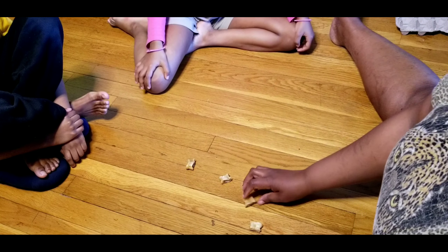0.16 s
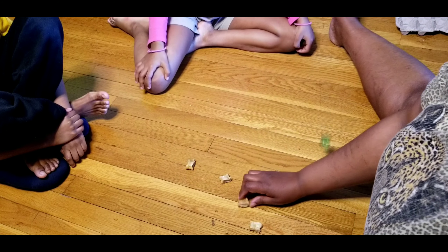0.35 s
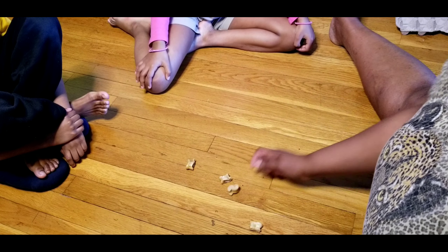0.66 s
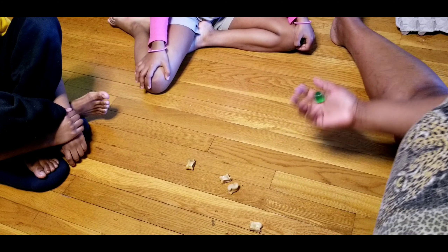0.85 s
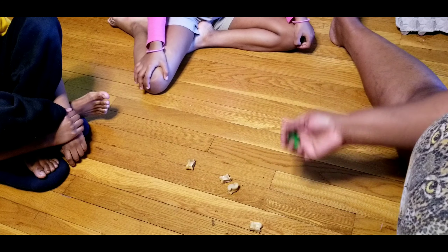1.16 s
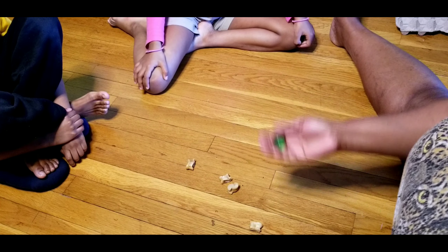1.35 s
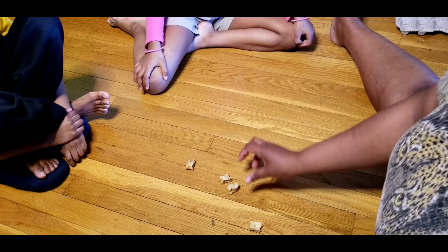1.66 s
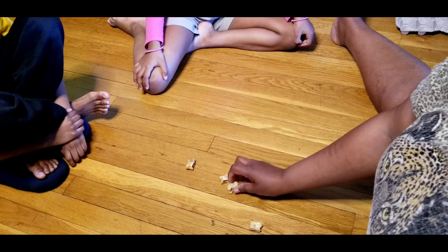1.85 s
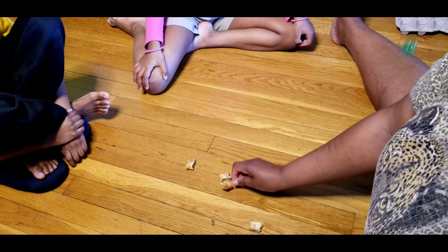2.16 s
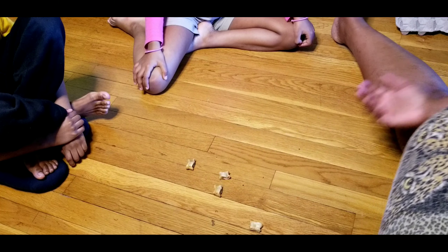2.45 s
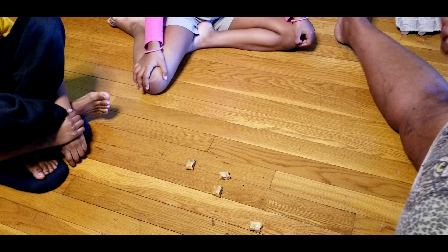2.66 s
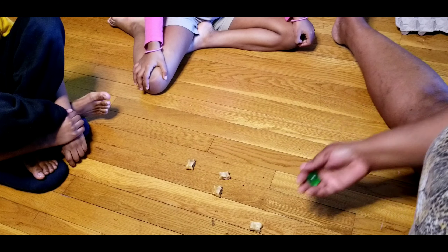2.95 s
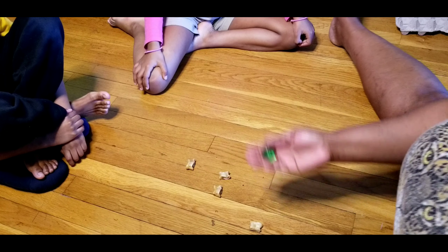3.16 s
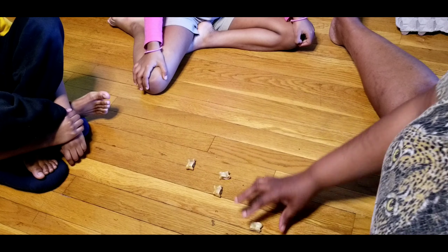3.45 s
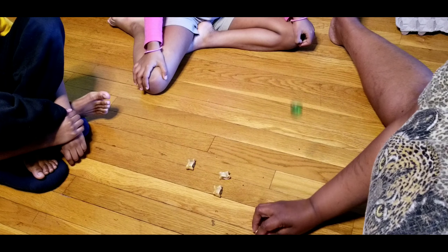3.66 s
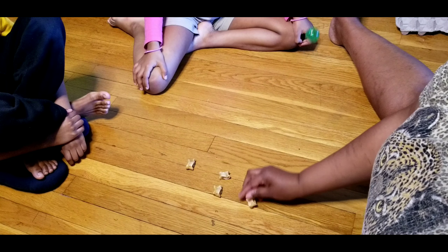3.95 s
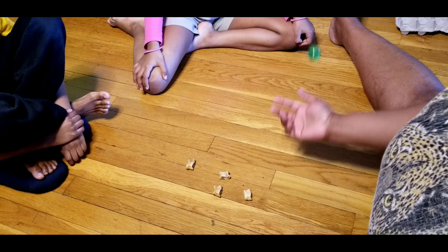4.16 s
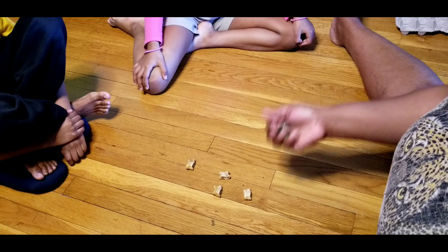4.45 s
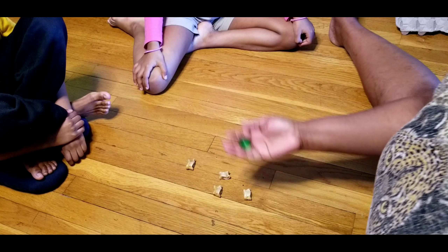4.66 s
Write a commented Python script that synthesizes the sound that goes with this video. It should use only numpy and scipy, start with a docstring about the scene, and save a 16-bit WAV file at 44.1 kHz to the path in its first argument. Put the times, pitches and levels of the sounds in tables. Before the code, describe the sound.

Close on a wooden floor in a furnished room, a small ball lands with a hollow, woody thump, followed by light bone clacks. A second, softer bounce brings a dense, bright rattle of knucklebones; a third, softer still, brings a short crisp clatter. Fingers brush the boards and the palm pats softly. Faint appliance hum and airy hiss lie underneath, picked up by a small nearby stereo microphone.

```python
"""A rubber ball bounces three times on a sprung wooden floor in a furnished room: each landing rings floor modes.
Between the bounces a hand works small knucklebones: clacks ring short wood and bone modes, nudged bones
tick at one pitch, drags are random slips through the same modes, palm and knuckles thud on the floor.
Treble hiss swells and sinks; an appliance hums and hisses faintly far away as wavering sines
and coloured noise, and a thin tone comes and goes. The room adds a tail of decaying noise."""
import sys
import numpy as np
from scipy import signal
from scipy.fft import rfft, irfft
from scipy.io import wavfile

SR = 44100
rng = np.random.default_rng(int(sys.argv[2]) if len(sys.argv) > 2 else 0)


def pcm_store(signal):
    """Save signal as 16-bit PCM."""
    levels = np.round(np.clip(np.atleast_2d(signal), -1, 1) * 32767)
    wavfile.write(sys.argv[1], SR, levels.astype(np.int16).T)


def gain_from_db(level_db):
    """Convert decibel levels to linear amplitude factors (20 dB per decade)."""
    decades = np.asarray(level_db, float) / 20
    return 10 ** decades


N = 212562
CONTROL_STEP = 40   # samples between points of slow curves
KNOCK_TOP_HZ, EDGE_TOP_HZ, SNAP_TOP_HZ = 2800, 6900, 16500   # contact time rounds off above these


def rms_one(x):
    """Scale to unit rms."""
    return x / np.sqrt(np.mean(x ** 2) + 1e-20)


def at_hz(points, hz):
    """Read a table on a log-frequency axis."""
    table_hz, values = np.array(points)[:, :2].T
    return np.interp(np.log(hz), np.log(table_hz), values)


def cut(x, hz, kind):
    """Steep causal low- or high-pass."""
    return signal.sosfilt(signal.butter(4, hz, kind, fs=SR, output="sos"), x)


def drift(rate_hz):
    """Slow random wander of rms 1: noise through two equal one-pole low-passes."""
    r = np.exp(-2 * np.pi * rate_hz * CONTROL_STEP / SR)
    noise = rng.standard_normal(N // CONTROL_STEP + 2002)
    slow = signal.lfilter([1], [1, -2 * r, r * r], noise)[2000:]   # settled part
    return np.interp(np.arange(N) / CONTROL_STEP, np.arange(len(slow)), rms_one(slow))


def swells(times, peak_db, rise_db_per_s, fall_db_per_s):
    """Gain of overlapping swells, straight in dB up to a crest and down; powers add."""
    late_s = np.arange(0, N + CONTROL_STEP, CONTROL_STEP) / SR - np.reshape(times, (-1, 1))
    shape_db = np.minimum(rise_db_per_s * late_s, -fall_db_per_s * late_s)
    power = gain_from_db(np.reshape(peak_db, (-1, 1)) + shape_db) ** 2
    return np.interp(np.arange(N) / CONTROL_STEP, np.arange(late_s.shape[1]), np.sqrt(power.sum(0)))


def ring(clicks, hz, t60_s):
    """Mode as a two-pole resonator: a unit click starts a decaying sine of initial height 1."""
    r, w = gain_from_db(-60 / (t60_s * SR)), 2 * np.pi * hz / SR
    return signal.lfilter([0, np.sin(w)], [1, -2 * r * np.cos(w), r * r], clicks + 1e-18)


def impulses(times, sizes):
    """Clicks at given times; sizes may hold two channels."""
    out = np.zeros(np.shape(sizes)[:-1] + (N,))
    out[..., np.round(np.asarray(times) * SR).astype(int)] = sizes
    return out


def contact(x, seconds):
    """A soft contact spreads a click into a half-sine push of unit area."""
    push = np.sin(np.pi * np.arange(.5, seconds * SR) / (seconds * SR))
    return signal.lfilter(push / push.sum(), [1], x)


def focus_db(hz, centre_hz):
    """Modes near the centre of a contact answer most; loss grows with octaves squared."""
    return -13.5 * np.log2(hz / np.maximum(centre_hz, 300)) ** 2


# Left-right likeness of diffuse sound. Each row: frequency in Hz, correlation.
LIKENESS = [(60, 0.75), (180, 0.86), (550, 0.51), (1650, 0.018), (4970, 0.089), (15000, -0.45)]


def spread(mid, side, hz):
    """Mix two independent signals into left and right of the tabled likeness."""
    alike = np.clip(at_hz(LIKENESS, hz), -1, 1)
    return np.sqrt(1 + alike) * mid + np.sqrt(1 - alike) * side * [[1], [-1]]


def diffuse(spectrum):
    """Stereo noise of a given colour at rms 1."""
    hz = np.maximum(np.fft.rfftfreq(N, 1 / SR), 1)
    mid, side = rfft(rng.standard_normal((2, N)))
    return rms_one(irfft(spread(mid, side, hz) * gain_from_db(at_hz(spectrum, hz)), N))


# Ball landings. Each row: start in seconds, relative level in dB.
BOUNCES = [(0.3966, 0), (2.0768, -4.5), (3.7942, -8)]
# Floor modes. Each row: frequency in Hz, free t60 in s, relative level in dB at each of three landing spots.
FLOOR_MODES = [(60.7, .25, 2.5, 3, 12.5), (92.4, 0.33, -11.5, -6, -7), (136.5, 0.16, -37, -19, -40),
               (191.3, 0.37, -15.5, -13, -8), (220.4, 0.3, -20, -12, -8.5), (281, 0.062, 3, 8, 12.5),
               (317.4, 0.11, -7.5, -8.5, 2), (382, 0.078, -15.5, -6.5, 8), (431, 0.13, -16, -5, 0.5),
               (507.8, 0.054, 8.5, 2, 10), (513.6, 0.068, -3, 10.5, -13), (640, 0.11, -14, -16, -16),
               (729.5, 0.1, -15.5, -9.5, -9.5), (900, 0.073, -10, -5, -7)]
# Small wood and bone modes: knock, hard edge, thin snap. Each row: frequency in Hz, relative level in dB,
# t60 in s of a bone's ring.
KNOCK_MODES = [(513, 3, 0.065), (767, -5.5, 0.024), (878, -12, 0.03), (1060, -10.5, 0.022),
               (1388, -2.5, 0.013), (1720, 3.5, 0.0056), (2113, 0.5, 0.014), (2530, 5.5, .006)]
EDGE_MODES = [(3300, -16, 0.0082), (4074, -6, 0.0022), (4716, -1.5, 0.0023), (5500, -5.5, 0.0018)]
SNAP_MODES = [(8540, 15, 0.0011), (9260, -7, 0.00056), (13500, -13.5, 0.0018)]


def ball():
    """Each landing pushes the floor modes by spot, slaps small wood modes and ticks the rubber skin."""
    lag_cycles = 0.56   # the boards pass the blow on: every other mode starts later
    s, level_db = np.transpose(BOUNCES)
    boom = slap = skin = 0
    for k, (hz, t60_s, *spot_db) in enumerate(FLOOR_MODES):
        push = -gain_from_db(level_db + np.array(spot_db) - 16.0)
        boom = boom + ring(impulses(s + k % 2 * lag_cycles / hz, push), hz, t60_s)
    for k, (hz, db, t60_s) in enumerate(KNOCK_MODES):
        blow = gain_from_db(level_db + db + focus_db(hz, 1150) - 16.5)
        slap = slap + (-1) ** k * ring(impulses(s + 0.00098, blow), hz, 0.75 * t60_s)
    for hz, _, t60_s in EDGE_MODES + SNAP_MODES:
        skin = skin + ring(impulses(s, gain_from_db(level_db - 47.5)), hz, t60_s)
    boom = cut(contact(boom, seconds=0.0011), 130, "high")   # boards radiate little below this
    return boom, cut(slap, 2200, "low") + skin


# Bones striking boards and each other. Each row: start in seconds, relative level in dB of knock,
# of edge, of snap, knock centre in Hz.
CLACKS = [(0.1893, -38, -55, -73, 1190), (0.227, -33.5, -49.5, -74, 1410), (0.2328, -41, -58, -72, 1340),
          (0.2787, -45, -42.5, -73.5, 1680), (0.5492, -31.5, -66, -85, 1230),
          (0.6319, -29.5, -64, -81, 1060), (0.6655, -33.5, -55, -76, 1110), (0.6816, -26.5, -34, -66, 1330),
          (0.6871, -25, -31, -55, 1150), (0.7034, -36.5, -55, -61, 1220), (0.7561, -29, -42, -74, 1240),
          (1.2612, -46, -48.5, -58, 1420), (1.3462, -46, -59.5, -61.5, 1085),
          (2.1869, -19.5, -19, -45, 1270), (2.2016, -22.5, -26, -42.5, 1300),
          (2.2525, -26.5, -18, -44, 1250), (2.2556, -21, -42, -54, 1320), (2.2655, -40, -42, -36.5, 1160),
          (2.3019, -21.5, -24, -52, 1230), (2.3212, -43, -15, -52, 1260), (2.3241, -29, -29, -33, 1340),
          (2.3337, -27.5, -38, -56, 1090), (2.3823, -27.5, -50, -50.5, 1320), (2.4005, -36, -34, -55, 1060),
          (2.419, -24.5, -20, -46, 1430), (2.4292, -55, -50.5, -41.5, 1020), (2.471, -28, -21.5, -44, 1530),
          (2.4868, -25.5, -58, -47, 1330), (2.5001, -45, -23, -44, 1380), (2.5129, -31, -50, -48, 1330),
          (2.5204, -44, -24, -47, 1210), (2.5279, -30, -51, -48, 1540), (2.5403, -35, -26, -43, 1430),
          (2.56, -41, -31, -62, 1410), (2.5726, -34, -31, -59, 1160), (2.583, -37.5, -53, -53, 1400),
          (2.9604, -36.5, -47, -53.5, 1394), (3.659, -37, -60, -66, 1200), (3.9474, -33, -47, -79, 1280),
          (3.9827, -19.5, -18.5, -35.5, 1410), (4.0118, -62, -39, -38, 1340),
          (4.0693, -23.5, -20, -29, 1410), (4.075, -33, -31, -57, 1380), (4.1119, -55, -35, -36.5, 1480),
          (4.1415, -26, -20.5, -38.5, 1580), (4.18, -30, -26.5, -45, 1580), (4.2133, -29.5, -37, -52, 1230),
          (4.237, -32, -30.5, -50, 1530)]
# Where the hand works. Each row: time in seconds, left minus right in dB.
HAND = [(0.19, 5), (0.28, -2), (0.7, 4), (1.3, 14.5), (2.0, 3), (2.19, 1), (2.55, 1.5), (2.96, 10),
        (3.8, 7.5), (4.2, -1)]


def bones():
    """Every clack strikes each mode with a strength of its own; the first swing is a pull."""
    s, *blows_db, centre_hz = np.transpose(CLACKS)
    scatter_db = 6.5 * rng.standard_normal(len(s))   # single bones land left or right of the hand
    pan_db = np.interp(s, *np.transpose(HAND)) + scatter_db
    tops_hz = KNOCK_TOP_HZ, EDGE_TOP_HZ, SNAP_TOP_HZ
    shades_db = 0, -1.5, -3.0   # the treble is shaded on the left
    out = 0
    for modes, blow_db, top_hz, shade_db in zip((KNOCK_MODES, EDGE_MODES, SNAP_MODES), blows_db, tops_hz, shades_db):
        sides = gain_from_db((pan_db + shade_db) * [[.5], [-.5]])
        strength_db = rng.normal(0, 2.0, (len(s), len(modes)))
        if modes is KNOCK_MODES:
            strength_db = strength_db + focus_db(np.array(modes)[:, 0], centre_hz[:, None])
        rings = 0
        for k, (hz, db, t60_s) in enumerate(modes):
            blow = sides * gain_from_db(blow_db + db - 6.5 + strength_db[:, k])
            rings = rings + ring(impulses(s, blow), hz, t60_s)
        out = out - cut(rings, top_hz, "low")
    return out


# Bones nudged inside the cupped hand. Each row: start in seconds, relative level in dB, hollow pitch in Hz.
TICKS = [(0.278, -39, 1700), (0.303, -54.5, 1800), (1.929, -43, 1400), (1.9904, -41.5, 1340),
         (2.014, -64.5, 1400), (2.0539, -45.5, 1300), (3.777, -40.5, 1720), (3.86, -40, 1357)]


def ticks():
    """One damped resonance per nudge, softly struck."""
    rings = sum(ring(impulses([s], [gain_from_db(db)]), hz, t60_s=.025) for s, db, hz in TICKS)
    return contact(rings, seconds=.0003)


# Fingers and bones dragged over the boards. Each row: hardest pressure in seconds, relative dull level in dB,
# relative bright level in dB, centre of the dull rub in Hz.
DRAGS = [(0.118, -62, -81, 714), (0.213, -49, -70, 1150), (0.283, -59, -78, 1670), (0.56, -47, -76, 1010),
         (0.59, -71, -89, 800), (0.715, -47, -74, 1040), (0.76, -55, -67, 1035), (0.8, -72, -68, 1035),
         (1.34, -68, -76.5, 780), (1.689, -73, -97, 1900), (1.769, -67, -90, 550), (1.83, -71.5, -100, 550),
         (1.95, -51.5, -100, 1250), (2.009, -78, -95, 1100), (2.45, -46, -68, 1210), (2.51, -55, -74, 1110),
         (2.68, -66.5, -73, 950), (2.869, -66, -92, 600), (2.911, -79, -89.5, 600), (2.94, -87, -75, 1100),
         (3.57, -63, -77, 805), (3.66, -48, -71.5, 1200), (3.7, -74, -93, 900), (3.76, -62, -98, 1330),
         (4.2, -59, -66, 1100), (4.256, -64, -66, 1300), (4.33, -85.5, -82, 1390)]


def drags():
    """Tiny random slips of uneven size excite knock and edge modes under swelling pressure."""
    slips_per_s, press_db_per_s, lift_db_per_s, grip_waver_db = 870.0, 351, 245.5, 3.5
    size = gain_from_db(4.5 * np.minimum(rng.exponential(1, N), 4))
    slips = (rng.random(N) < slips_per_s / SR) * size * rng.choice([-1, 1], N)
    s, dull_db, bright_db, centre_hz = np.transpose(DRAGS)
    centre_hz = np.interp(np.arange(N) / SR, s, centre_hz)
    dull = bright = 0
    for k, (hz, db, t60_s) in enumerate(KNOCK_MODES):
        dull = dull + (-1) ** k * gain_from_db(db + focus_db(hz, centre_hz)) * ring(slips, hz, t60_s)
    for k, (hz, db, t60_s) in enumerate(EDGE_MODES):
        bright = bright + (-1) ** k * gain_from_db(db) * ring(slips, hz, t60_s)
    dull = swells(s, dull_db, press_db_per_s, lift_db_per_s) * rms_one(cut(dull, KNOCK_TOP_HZ, "low"))
    bright = swells(s, bright_db, press_db_per_s, lift_db_per_s) * rms_one(cut(bright, EDGE_TOP_HZ, "low"))
    return gain_from_db(-4.5 + grip_waver_db * drift(32)) * (dull + bright)   # uneven grip


# Soft palm and knuckle thuds. Each row: start in seconds, relative level in dB.
THUDS = [(0.117, -46), (0.133, -41), (0.324, -48), (1.261, -41), (1.326, -41.5), (1.35, -43.5),
         (1.372, -46.5), (2.959, -35.5), (2.988, -40.5), (3.589, -45), (3.618, -43.5)]


def thuds():
    """Flesh lands slowly, so mostly the low floor modes answer, damped by the hand."""
    hand_damping = .4   # share of the free ring time
    s, level_db = np.transpose(THUDS)
    strength_db = rng.normal(0, 6.0, (len(s), len(FLOOR_MODES)))
    modes = 0
    for k, (hz, t60_s, *_) in enumerate(FLOOR_MODES):
        modes = modes + ring(impulses(s, gain_from_db(level_db - 12.5 + strength_db[:, k])), hz, hand_damping * t60_s)
    return cut(contact(modes, seconds=0.00307), 75, "high")


# Reverberation of the room. Each row: frequency in Hz, t60 in s.
ROOM_T60 = [(100, 0.42), (300, 0.3), (550, 0.23), (1000, 0.31), (3000, 0.37), (8000, 0.11), (15000, 0.2)]


def room(x):
    """Diffuse echoes: third-octave noise bands, each dying at its own rate."""
    t = np.arange(SR // 2) / SR
    white = rng.standard_normal((2, 2, len(t)))
    edges_hz = 25 * 2 ** (np.arange(29) / 3)
    tail = 0
    for k, (low, high) in enumerate(zip(edges_hz, edges_hz[1:])):
        band = signal.butter(2, [low, high], "band", fs=SR, output="sos")
        mid, side = signal.sosfilt(band, white[k % 2])
        hz = np.sqrt(low * high)
        tail = tail + spread(mid, side, hz) * gain_from_db(-60 * t / at_hz(ROOM_T60, hz))
    tail = tail * np.clip((t - .001) / .002, 0, 1)   # opens from 1 to 3 ms
    tail = tail / np.sqrt(np.sum(tail ** 2) / 2)
    return gain_from_db(0.6) * signal.fftconvolve(x[None], tail, axes=1)[:, :N]


# Swells of treble hiss. Each row: crest in seconds, level in dB.
HISS_SWELLS = [(0.08, -68), (0.454, -70.5), (0.7, -75.5), (0.82, -64), (1.265, -66), (1.48, -67.5),
               (1.774, -67.5), (2.1, -72), (2.4, -57), (2.668, -73), (2.958, -62.5), (3.298, -63),
               (3.556, -67), (3.8, -71.5), (4.1, -64), (4.3, -70), (4.564, -70), (4.82, -67.5)]
# Colour of treble hiss. Each row: frequency in Hz, relative density in dB per Hz.
HISS_COLOUR = [(5000, -44.5), (7800, -13.5), (8300, -5), (10000, -3.5), (13500, 2), (16000, -6)]


def treble_hiss():
    """Treble hiss swells and sinks over a faint constant level."""
    s, swell_db = np.transpose(HISS_SWELLS)
    gain = swells(s, swell_db, rise_db_per_s=102.5, fall_db_per_s=68.5) + gain_from_db(-83.5)
    return gain * diffuse(HISS_COLOUR)


# Appliance hum lines. Each row: frequency in Hz, middle level in dB rms, waver rate in Hz.
HUM = [(49.5, -66, 14), (116.7, -64, 1.1), (244, -68.5, 13)]


def hum():
    """Narrow lines: sines wavering in level and phase."""
    t = np.arange(N) / SR
    out = 0
    for hz, db, rate_hz in HUM:
        line = np.sqrt(2) * np.sin(2 * np.pi * hz * t + drift(rate_hz))
        out = out + gain_from_db(db + 2.0 * drift(rate_hz)) * line
    return out


# Thin tone. Each row: time in seconds, left level in dB rms.
WHINE = [(2.6, -110), (2.7, -68), (3.5, -77), (3.7, -110)]


def whine():
    """A thin sine of drifting phase comes and goes, weaker on the right."""
    t = np.arange(N) / SR
    level_db = np.interp(t, *np.transpose(WHINE), left=-150, right=-150)
    tone = gain_from_db(level_db) * np.sqrt(2) * np.sin(2 * np.pi * 1641 * t + drift(1))
    return tone * [[1], [.4]]


# Colour of far hiss and rumble. Each row: frequency in Hz, relative density in dB per Hz.
AIR = [(25, -12.5), (55, -3), (90, -11), (180, -12.5), (290, -14.5), (390, -26.5), (950, -34), (1350, -22),
       (1750, -22.5), (2200, -15), (2800, -27), (3650, -34), (4400, -28.5), (5500, -39), (7300, -49)]


def air():
    """Far hiss and rumble: coloured noise of slightly wavering level."""
    return gain_from_db(-59.5 + 0.52 * drift(8.9)) * diffuse(AIR)


def scene():
    """Near sources, their room sound and the background."""
    boom, slap = ball()
    boards = boom + thuds()
    near = cut(bones() + ticks() + drags() + slap, 336, "high")   # small bodies radiate little bass
    left, right = boards * gain_from_db([[.6], [-.6]]) + near
    direct = np.array([np.roll(left, 2), right])   # left lags by 2 samples
    echoes = room(gain_from_db(-4.0) * boards + near.mean(0)) * gain_from_db([[-.3], [.3]])
    return direct + echoes + treble_hiss() + hum() + whine() + air()


def band_limit(x):
    """A steep low-pass at the top of the band."""
    return signal.sosfilt(signal.butter(12, 16470, fs=SR, output="sos"), x)


def record(dry):
    """The small microphones lose the deepest bass; the top is cut."""
    mix = cut(dry, 38, "high")
    mix = signal.sosfilt(signal.cheby2(12, 50, 16000, fs=SR, output="sos"), mix)
    return band_limit(mix)


dry = scene()
out = record(dry)
pcm_store(out)
```